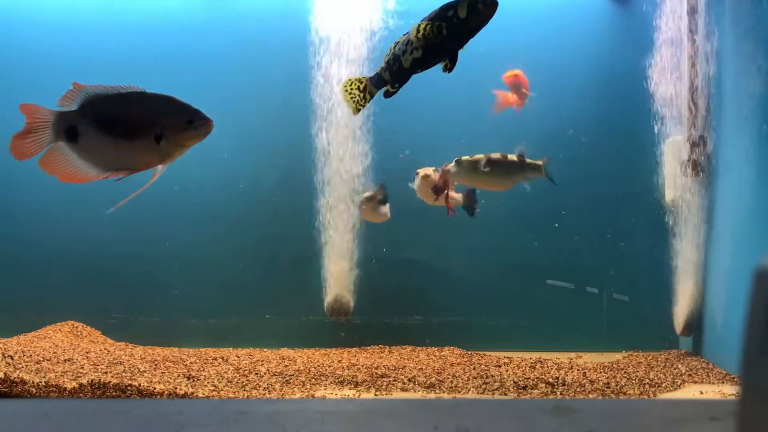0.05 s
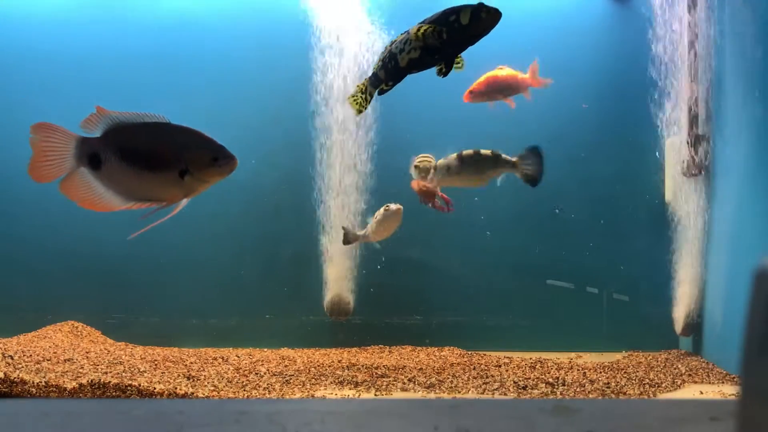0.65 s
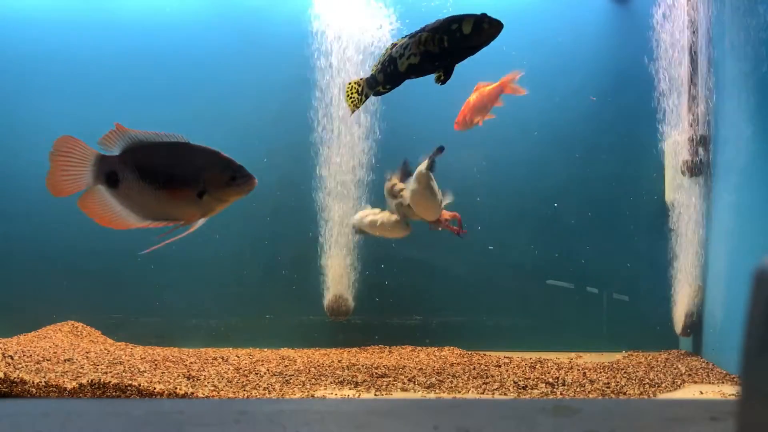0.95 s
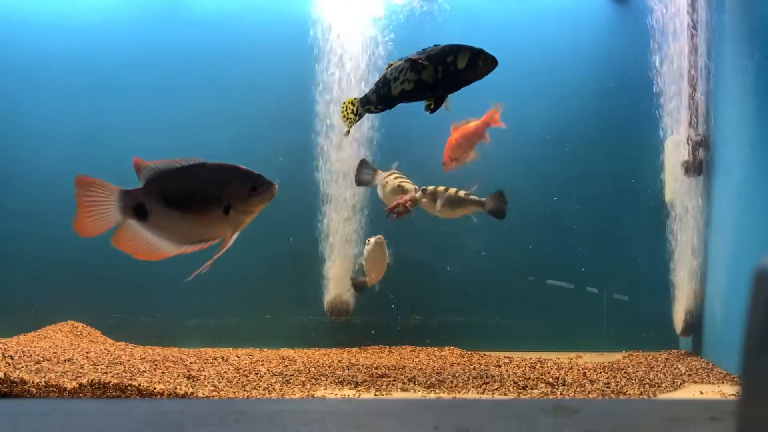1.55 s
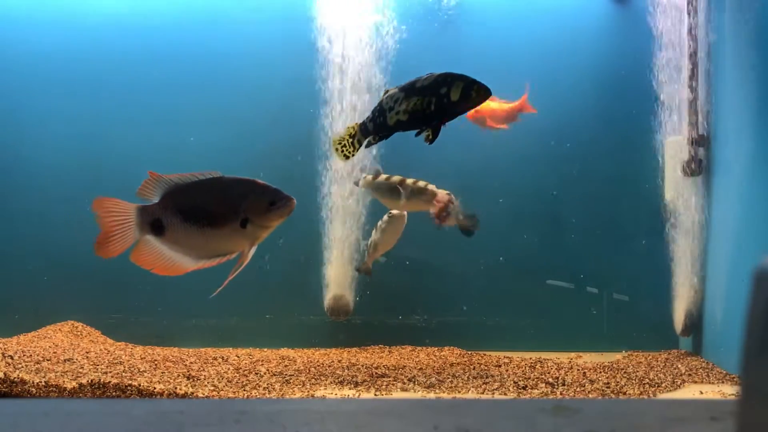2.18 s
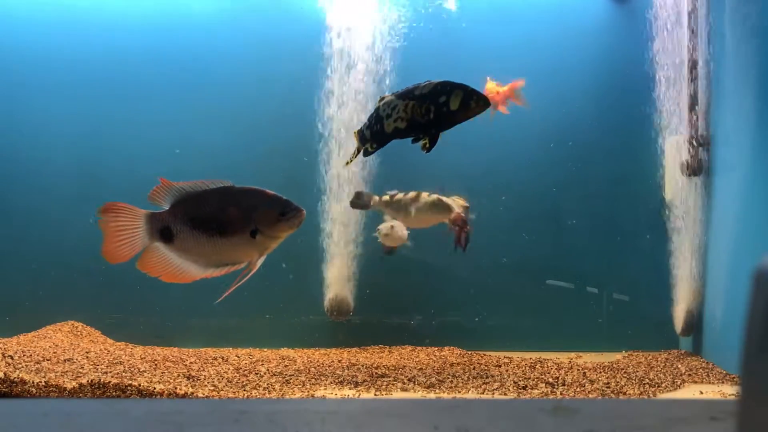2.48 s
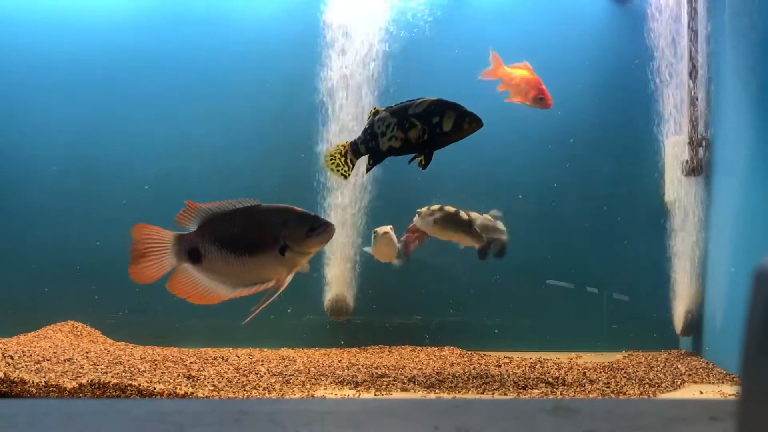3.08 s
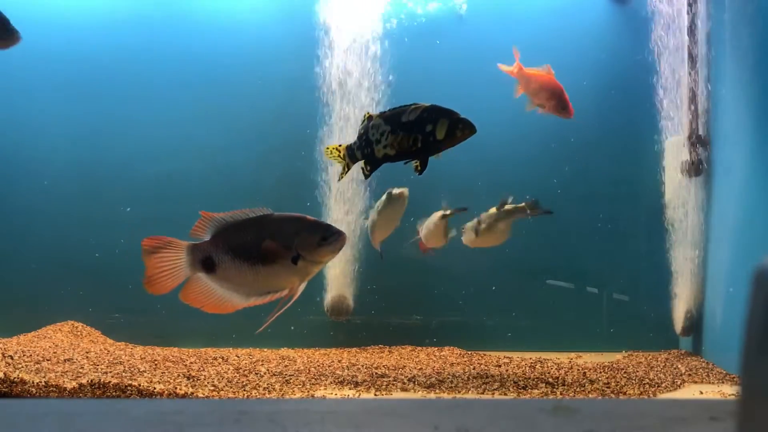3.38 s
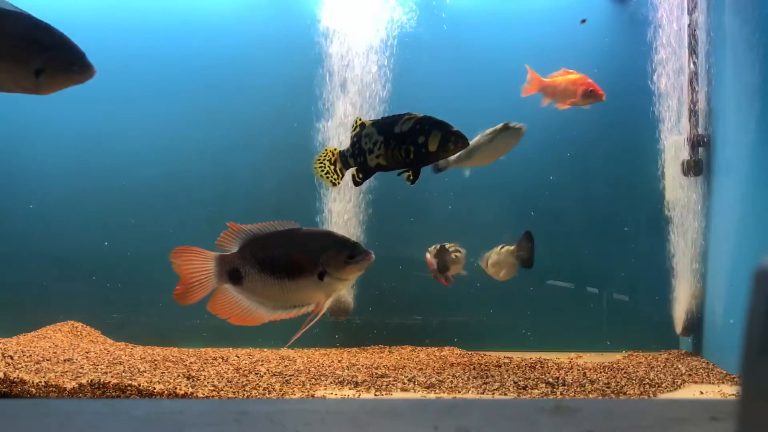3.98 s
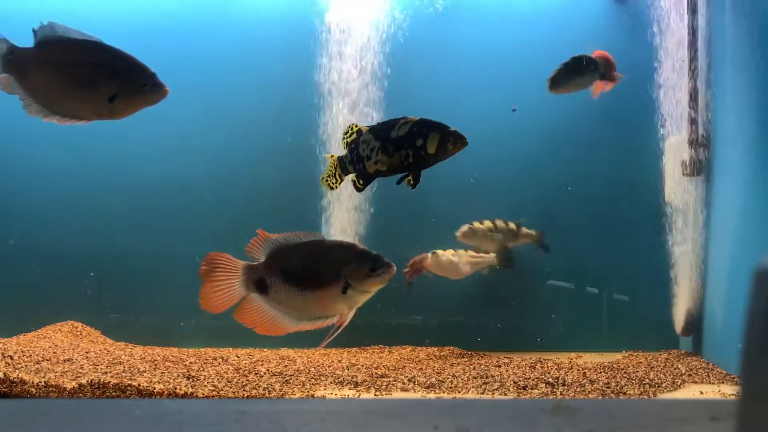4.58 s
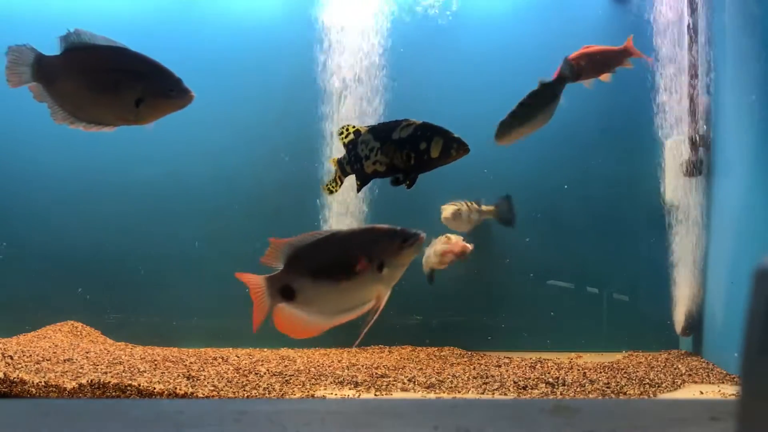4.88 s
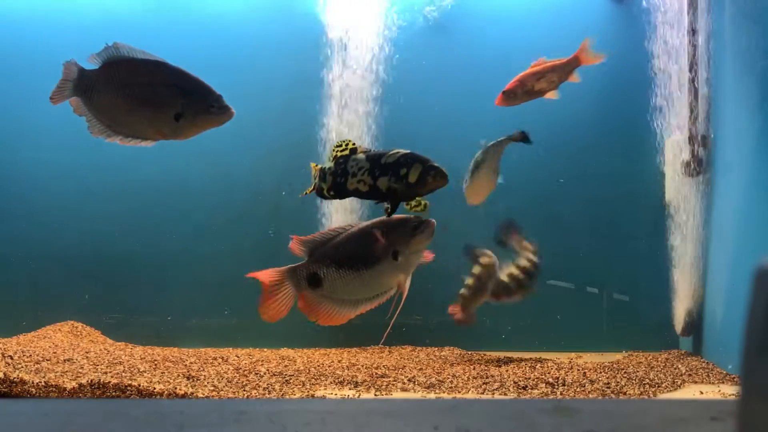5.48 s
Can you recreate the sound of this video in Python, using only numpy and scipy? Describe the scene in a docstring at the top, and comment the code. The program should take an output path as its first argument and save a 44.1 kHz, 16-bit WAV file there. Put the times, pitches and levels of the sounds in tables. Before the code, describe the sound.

An aquarium air pump hums low and steady, its housing buzzing faintly. Fine bubbles from two air stones simmer and fizz softly at the surface. A small bubble pops right at the start, then more pops and brief sprays of foam come in two clusters. After one last pop, the hum and simmer carry on. It is heard from in front of the glass in a quiet room.

```python
"""From the start an aquarium air pump hums over a low room rumble, an even hiss and a faint electrical whine.
Its diaphragm, pulled once per mains cycle, sounds harmonics of that rate, and its housing buzzes.
The air leaves two air stones as fine bubbles that simmer and fizz at the surface and keep the tank ringing.
A larger bubble pops at 0.2 s; more pops and brief sprays of foam follow from 1 to 1.8 s and from
3.1 to 3.6 s. After a last pop at 4.6 s the hum and the simmer carry on."""
import sys
import numpy as np
from scipy import signal
from scipy.fft import rfft, irfft
from scipy.io import wavfile
from scipy.ndimage import map_coordinates

SR = 44100
rng = np.random.default_rng(int(sys.argv[2]) if len(sys.argv) > 2 else 0)


def transcribe(signal):
    """Save signal, clipped to [-1, 1], as a 16-bit WAV file at the path in sys.argv[1]."""
    frames = np.atleast_2d(signal).T
    limited = np.clip(frames, -1, 1)
    pcm = np.round(limited * 32767).astype(np.int16)
    wavfile.write(sys.argv[1], SR, pcm)


N = 244314
TIME = np.arange(N) / SR
MAINS_HZ = 59.98


def from_db(db):
    """Decibels to amplitude ratio."""
    return 10 ** (np.asarray(db) / 20)


def unit_rms(x):
    """Normalisation to unit power."""
    return x / np.sqrt(np.mean(x ** 2) + 1e-30)


def level_at(spectrum, hz):
    """Interpolation of a spectrum on a log-frequency axis."""
    freqs, levels = np.transpose(spectrum)
    return np.interp(np.log(np.maximum(hz, 1)), np.log(freqs), levels)


def drift(per_s):
    """Random modulation: a smooth curve of spread near 1 that changes about per_s times a second."""
    knots, coarse_s = rng.standard_normal(512), TIME[::64]
    return np.interp(TIME, coarse_s, map_coordinates(knots, [coarse_s * per_s], mode="wrap"))


def band(x, low_hz, high_hz):
    """Band-pass filtering with gentle skirts."""
    sos = signal.butter(2, [low_hz, min(high_hz, .45 * SR)], "band", fs=SR, output="sos")
    return signal.sosfilt(sos, x)


def coloured_noise(spectrum, low_hz=1, high_hz=SR):
    """Spectral shaping: noise of the given density that falls away outside two edges."""
    hz = np.fft.rfftfreq(N, 1 / SR) + 1e-3
    edges = 1 / np.sqrt((1 + (low_hz / hz) ** 8) * (1 + (hz / high_hz) ** 8))
    shaped = rfft(rng.standard_normal(N)) * from_db(level_at(spectrum, hz)) * edges
    return irfft(shaped, N) * np.sqrt(SR / 2)


def resonance(drive, hz, t60_s):
    """A damped oscillator's response, confined to the octave around its pitch, at unit rms."""
    r, w = np.exp(-np.log(1000) / (t60_s * SR)), 2 * np.pi * hz / SR
    ringing = signal.lfilter([0, np.sin(w)], [1, -2 * r * np.cos(w), r * r], drive + 1e-18)
    return unit_rms(band(ringing, hz / np.sqrt(2), hz * np.sqrt(2)))


def clicks(per_s, spread_db):
    """Shot noise: impulses at random moments, many small and a few large."""
    out = np.zeros(N)
    moment, size, sign = rng.spawn(1)[0].random((int(per_s * N / SR), 3)).T
    level_db = spread_db * np.minimum(-np.log(1 - size), 4)
    out[(moment * N).astype(int)] = np.sign(sign - .5) * from_db(level_db)
    return out


def harmonic_series(partials, pitch_hz):
    """Superposition of steady tones on multiples of one pitch, each with a random phase."""
    return sum(np.sqrt(2) * from_db(db) * np.cos(2 * np.pi * (round(order) * pitch_hz * TIME + rng.random()))
               for order, db in partials)


def room_noise():
    """Broadband noise: a rumble that weakens towards the treble, and an even hiss above it."""
    # Spectra of the rumble and the hiss: frequency_hz, density_db_per_hz
    rumble = [(15, -77.5), (32, -94), (50, -70), (70, -79.5), (140, -82), (190, -87), (400, -92),
              (600, -96), (1200, -100.5), (2000, -104)]
    hiss = [(1500, -104), (3900, -103), (4900, -107), (7100, -107), (7800, -108.5), (9800, -108.5),
            (12000, -108), (13500, -109.5), (16000, -109.5)]
    return coloured_noise(rumble, high_hz=1800) + coloured_noise(hiss, low_hz=1520)


def electrical_whine():
    """A very faint harmonic series with a missing fundamental."""
    # Partials of the whine: harmonic_number, rms_db
    partials = [(2, -91), (3, -89), (4, -89), (5, -92), (6, -90), (7, -92), (8, -93), (9, -93), (10, -95),
                (11, -95), (12, -94), (13, -95), (14, -97), (15, -100)]
    return harmonic_series(partials, pitch_hz=993.3)


def tank_modes():
    """Forced resonance: churning water keeps the hollow modes of the tank sounding."""
    # Modes of the tank and its air space: pitch_hz, bandwidth_hz, rms_db
    modes = [(232, 63, -74), (362, 63, -65), (457, 16, -70.5), (599, 16, -73.5), (794, 19, -71.5),
             (1023.5, 13, -70.5), (1217, 44, -70), (1460, 16, -74.5)]
    return sum(from_db(db) * resonance(rng.standard_normal(N), hz, np.log(1000) / (np.pi * width_hz))
               for hz, width_hz, db in modes)


def fizz(rms_db, per_s, spread_db, flutter_db, bands=8):
    """Modulated shot noise: the finest bubbles burst as ticks, each size in clumps of its own."""
    edges_hz = np.geomspace(4500, 16000, bands + 1)
    ticks = sum(band(clicks(per_s / bands, spread_db), low, high) * from_db(flutter_db * drift(25))
                for low, high in zip(edges_hz, edges_hz[1:]))
    return from_db(rms_db) * unit_rms(ticks)


def foam_sprays(low_hz, high_hz, per_s):
    """A patch of foam gives way: shot noise under a brief Gaussian envelope."""
    # Collapses of foam: centre_s, crest_rms_db, sigma_s
    sprays = [(1.0, -66.5, .03), (1.24, -79, 0.062), (1.56, -71, 0.044), (1.763, -74, .04),
              (3.45, -68.5, .05)]
    envelope = sum(from_db(db) * np.exp(-.5 * ((TIME - s) / sigma_s) ** 2) for s, db, sigma_s in sprays)
    ticks = rng.standard_normal(N) * (rng.random(N) < per_s / SR)
    return envelope * unit_rms(band(ticks, low_hz, high_hz))


def bubble_pops(t60_s, chirp_per_s, tail_db, tail_t60_s, tail_ratio):
    """A larger bubble's resonance climbs as it opens; room reverberation holds its pitch for a moment."""
    # Single larger bubbles: start_s, peak_db, pitch_hz
    pops = [(.207, -53.5, 3770), (1.05, -64, 2900), (1.235, -61, 1850), (3.139, -54.5, 3500),
            (3.188, -65, 11700), (3.321, -59, 2300), (3.481, -58.5, 4450), (3.628, -59, 3030),
            (4.56, -61, 2280)]
    out = np.zeros(N)
    for start_s, peak_db, hz in pops:
        age = np.maximum(TIME - start_s, 0)
        ping = np.exp(-np.log(1000) * age / t60_s) * np.sin(2 * np.pi * hz * age * (1 + chirp_per_s * age))
        diffuse = unit_rms(band(rng.standard_normal(N), hz / tail_ratio, hz * tail_ratio))
        tail = (age > 0) * np.exp(-np.log(1000) * age / tail_t60_s) * diffuse
        out += from_db(peak_db) * (ping + from_db(tail_db) * tail)
    return out


def simmer(per_s, spread_db, t60_cycles, flutter_db, sizes=36):
    """Bubble resonance: thousands of small bubbles burst, each ringing at the pitch of its size."""
    # Spectrum of the water surface: pitch_hz, density_db_per_hz
    spectrum = [(220, -87.5), (380, -97), (520, -94.5), (780, -88), (1150, -90), (1500, -94),
                (1900, -101.5), (2800, -104.5), (3900, -105.5), (4900, -113), (7000, -115)]
    pitches_hz = np.geomspace(220, 7000, sizes)
    out = np.zeros(N)
    for hz, width_hz in zip(pitches_hz, np.gradient(pitches_hz)):
        bubbles = resonance(clicks(per_s / sizes, spread_db), hz, t60_cycles / hz)
        out += bubbles * np.sqrt(width_hz) * from_db(level_at(spectrum, hz) + flutter_db * drift(12))
    return out


def housing_buzz():
    """Forced vibration: the pump housing buzzes at weak, high harmonics of the mains rate."""
    # Partials of the housing: harmonic_number, rms_db
    partials = [(27, -82), (29, -85), (30, -87), (31, -88), (36, -89), (37, -88), (42, -91), (49, -90),
                (53, -91), (55, -86), (56, -89), (60, -89), (73, -90), (74, -93), (75, -89), (76, -93),
                (79, -93), (86, -91), (87, -95), (88, -95), (94, -94), (115, -93), (119, -94), (122, -96),
                (124, -97), (125, -97)]
    return harmonic_series(partials, MAINS_HZ)


def swell_db(order, glide_s=0.22):
    """Slow amplitude modulation of one hum partial: its level glides away, holds and glides back."""
    # Swells and dips of the hum: harmonic_number, start_s, end_s, change_db
    swells = [(6, 0.75, 1.37, 2.5), (8, -0.1, 0.56, -4), (8, 0.86, 1.35, -4), (13, 4.7, 5.34, -6.5)]

    def glide(s):
        return np.clip((TIME - s) / glide_s + .5, 0, 1)
    return sum(db * (glide(start) - glide(end)) for which, start, end, db in swells if round(which) == order)


def pump_hum(cabinet_hz, cabinet_width_hz, scatter_hz, waver, wavers_per_s, throb_db):
    """Periodic forcing: one stroke a cycle drives the cabinet; room scattering makes high partials waver."""
    # Partials of the diaphragm stroke: harmonic_number, rms_db
    partials = [(1, -39.5), (2, -44), (3, -53.5), (4, -51.5), (5, -59.5), (6, -59.5), (7, -69.5),
                (8, -63.5), (9, -75.5), (10, -80.5), (11, -73.5), (12, -74), (13, -64), (14, -74),
                (15, -67.5), (16, -74.5), (17, -73), (19, -78.5), (20, -73.5), (23, -85), (27, -96)]
    out = np.zeros(N)
    for order, level_db in partials:
        hz = round(order) * MAINS_HZ
        lag = 2 * np.arctan2(hz * cabinet_width_hz, cabinet_hz ** 2 - hz ** 2)   # cabinet resonance
        diffuse = 1 / (1 + (scatter_hz / hz) ** 4)
        phase = 2 * np.pi * hz * TIME - lag + diffuse * rng.uniform(-np.pi, np.pi)
        in_phase = 1 + waver * diffuse * drift(wavers_per_s)
        quadrature = waver * diffuse * drift(wavers_per_s)
        amplitude = np.sqrt(2) * from_db(level_db + swell_db(round(order)))
        out -= amplitude * (in_phase * np.cos(phase) + quadrature * np.sin(phase))
    return out * from_db(throb_db * drift(5.33))


def scene():
    """Superposition of pump, bubbles and quiet room, heard in front of the glass."""
    pump = pump_hum(cabinet_hz=166, cabinet_width_hz=40.7, scatter_hz=464,
                    waver=0.22, wavers_per_s=6.0, throb_db=0.34)
    pump += housing_buzz()
    surge = from_db(0.53 * drift(per_s=7.0))   # the bubble columns surge at random
    water = surge * (simmer(per_s=15000, spread_db=2.5, t60_cycles=37, flutter_db=2.0) + tank_modes())
    water += fizz(rms_db=-74.5, per_s=4200, spread_db=2.7, flutter_db=3.5)
    water += foam_sprays(low_hz=4450, high_hz=14100, per_s=4500)
    water += bubble_pops(t60_s=0.037, chirp_per_s=2.0, tail_db=-9.5, tail_t60_s=0.26, tail_ratio=1.045)
    return (pump + water + room_noise() + electrical_whine())[None]


def record(dry, notch_hz=10520, width_hz=1200, depth=0.41, cutoff_hz=15700):
    """Filtering: the microphone port takes a shallow notch out of the treble; a steep low-pass follows."""
    notched = signal.lfilter(*signal.iirnotch(notch_hz, notch_hz / width_hz, fs=SR), dry)
    heard = dry + depth * (notched - dry)
    return signal.sosfilt(signal.ellip(12, .1, 80, cutoff_hz, fs=SR, output="sos"), heard)


dry = scene()
out = record(dry)
transcribe(out)
```